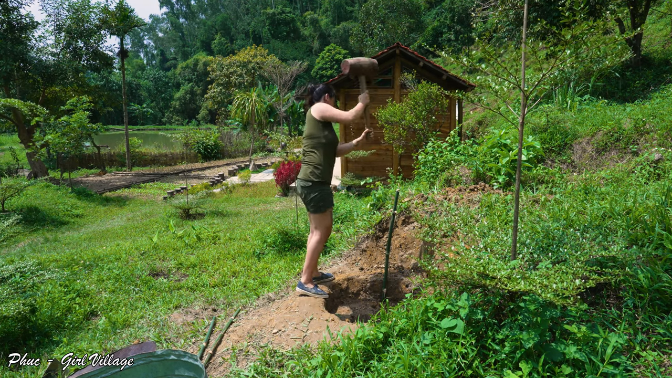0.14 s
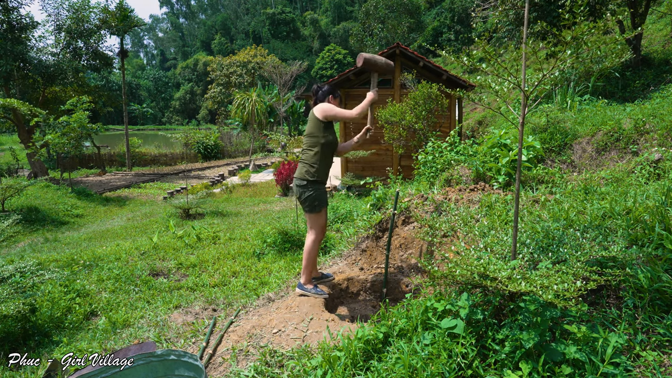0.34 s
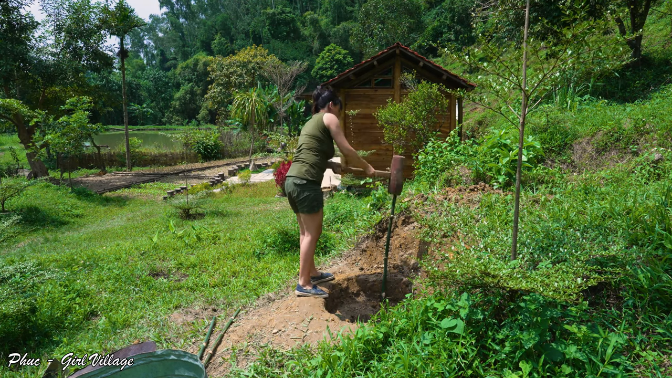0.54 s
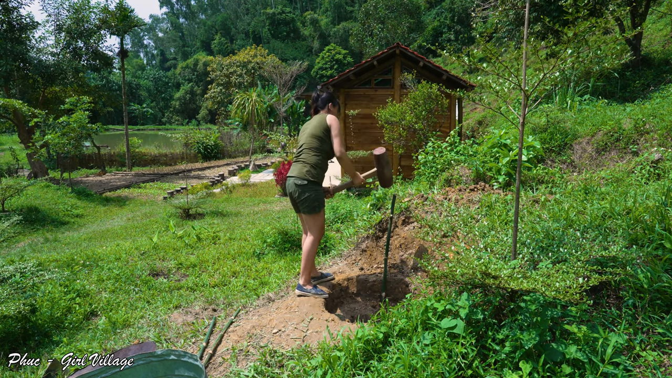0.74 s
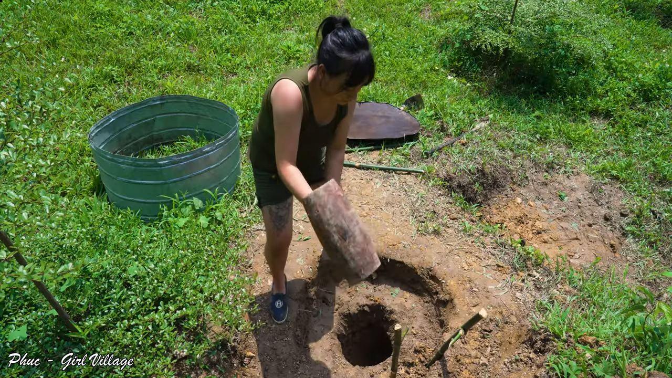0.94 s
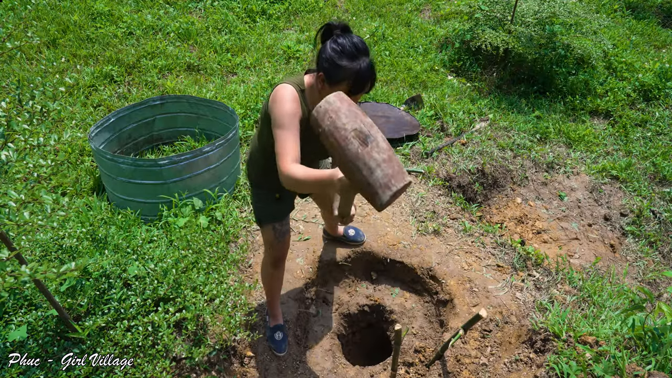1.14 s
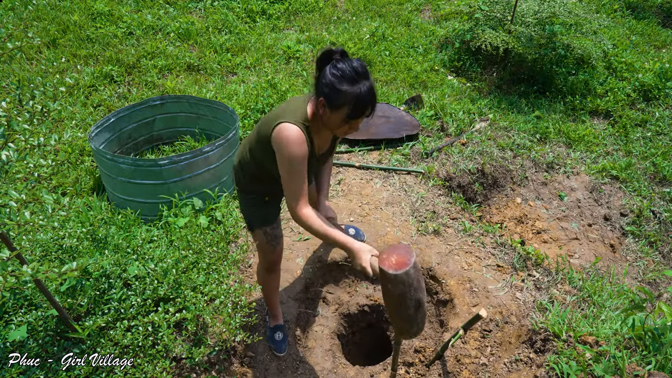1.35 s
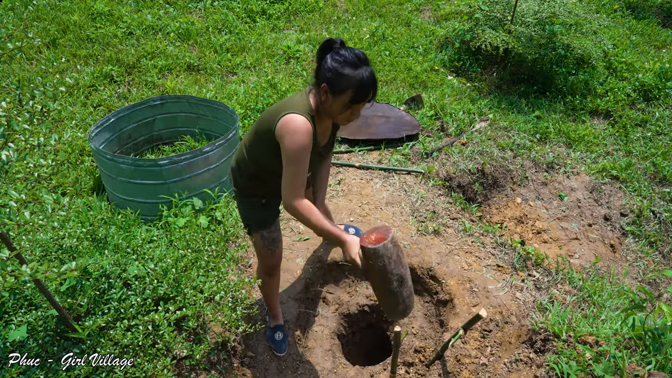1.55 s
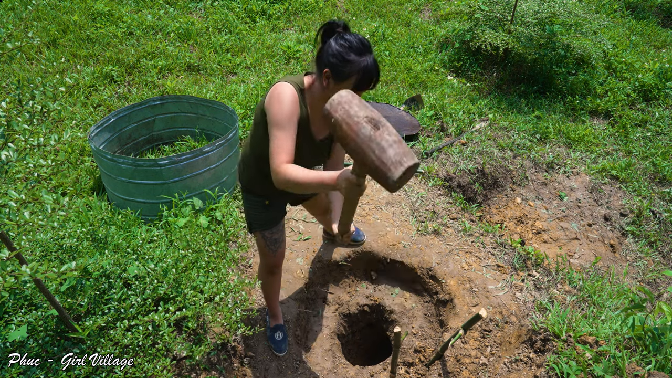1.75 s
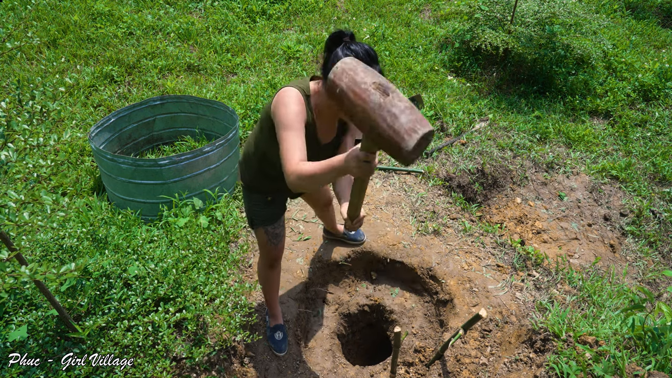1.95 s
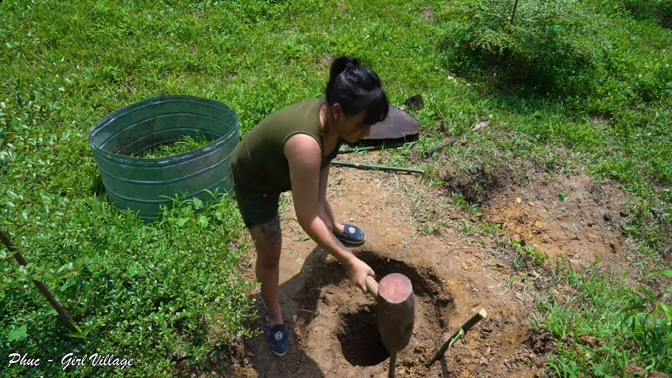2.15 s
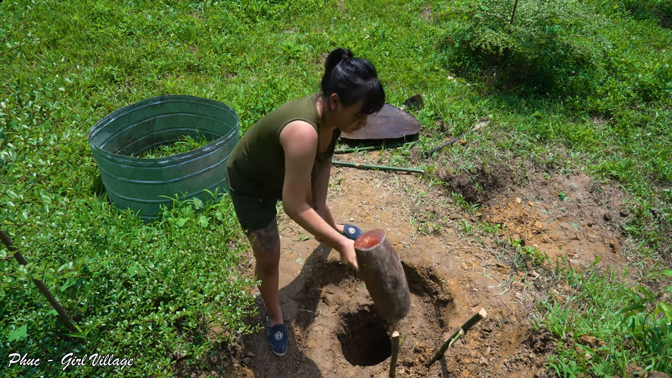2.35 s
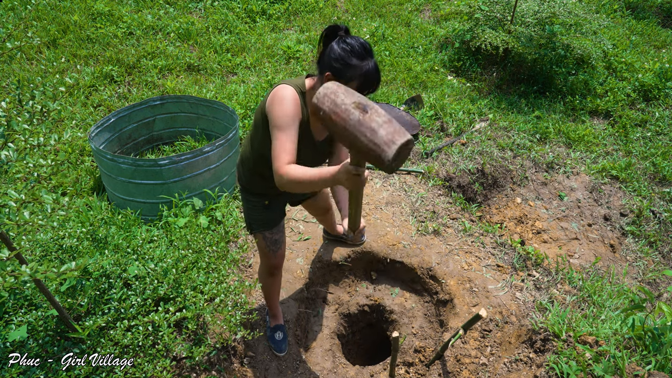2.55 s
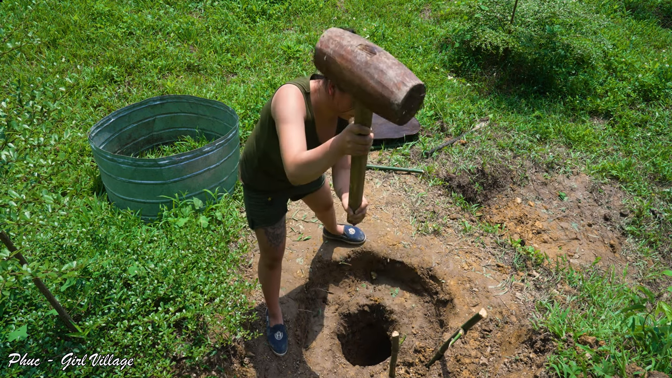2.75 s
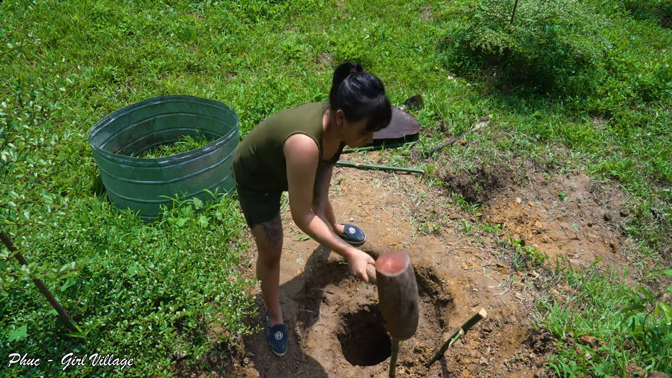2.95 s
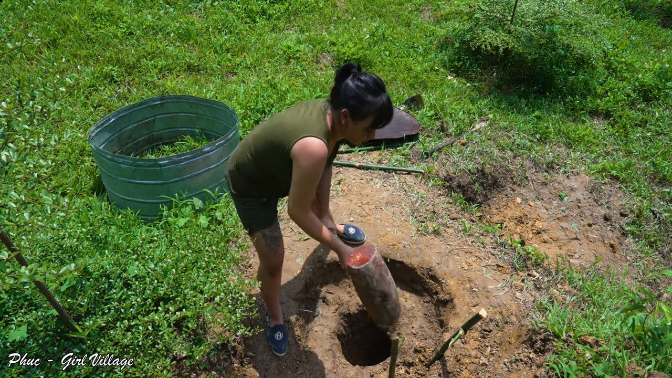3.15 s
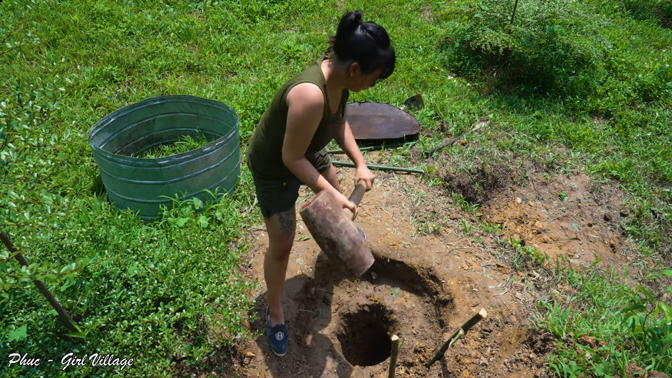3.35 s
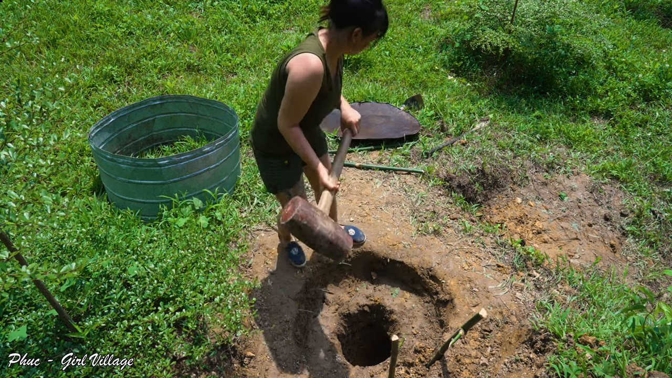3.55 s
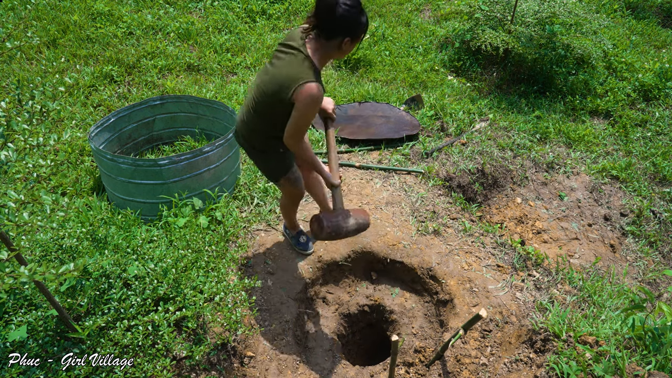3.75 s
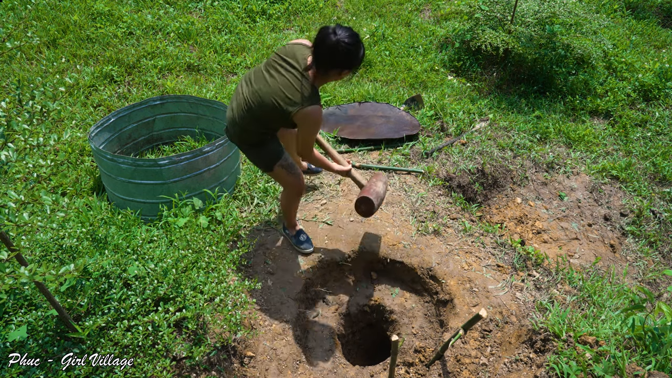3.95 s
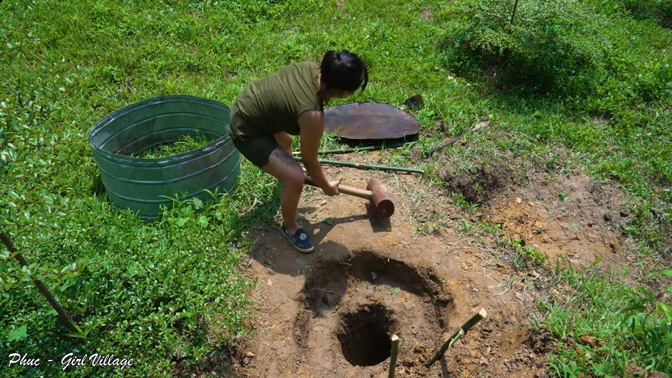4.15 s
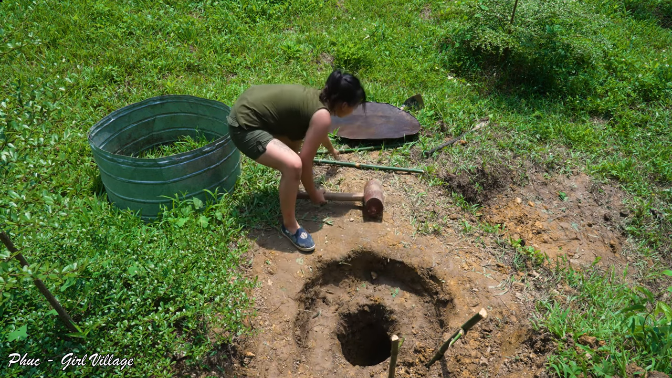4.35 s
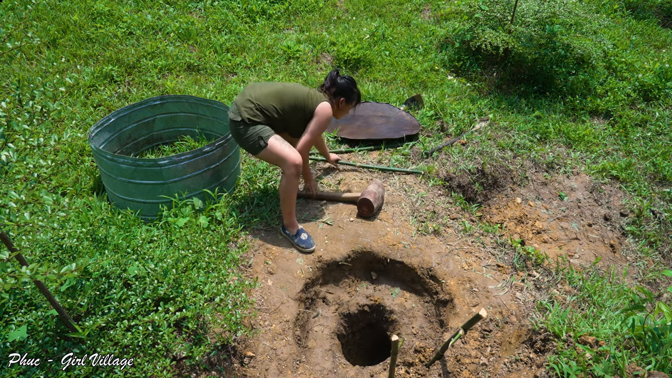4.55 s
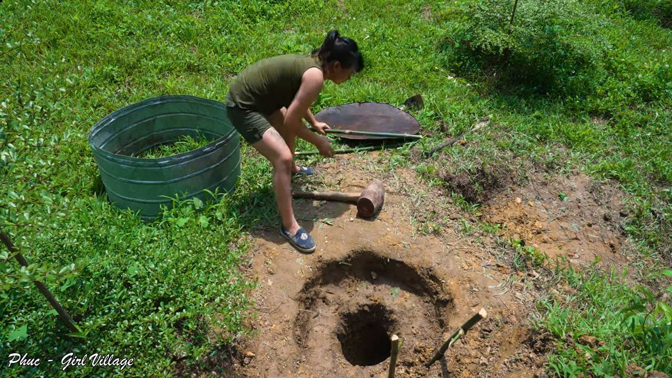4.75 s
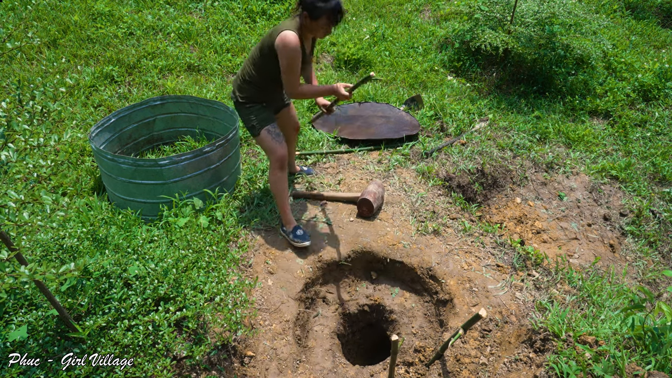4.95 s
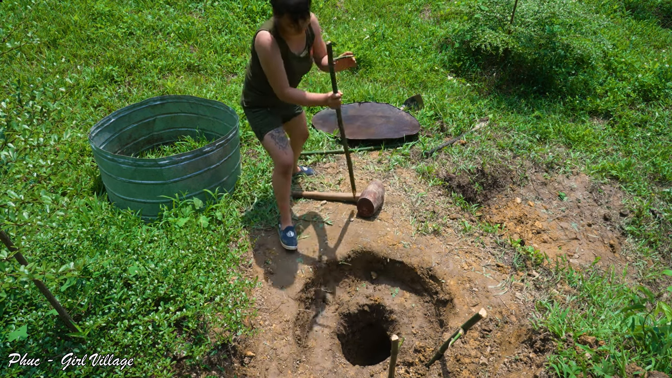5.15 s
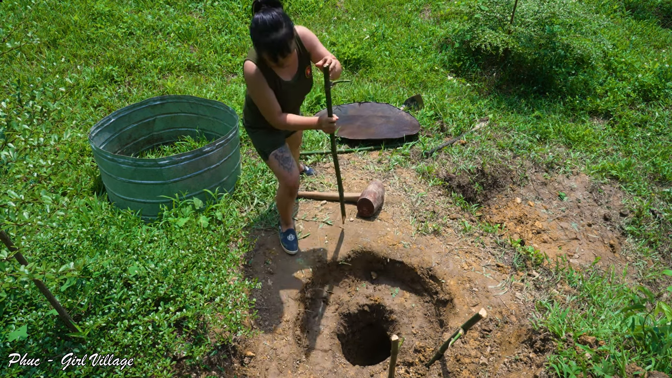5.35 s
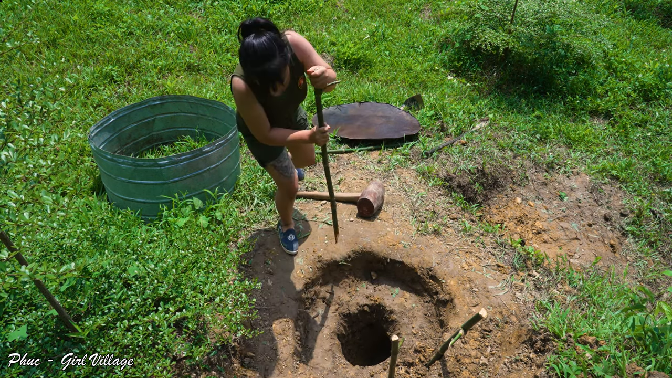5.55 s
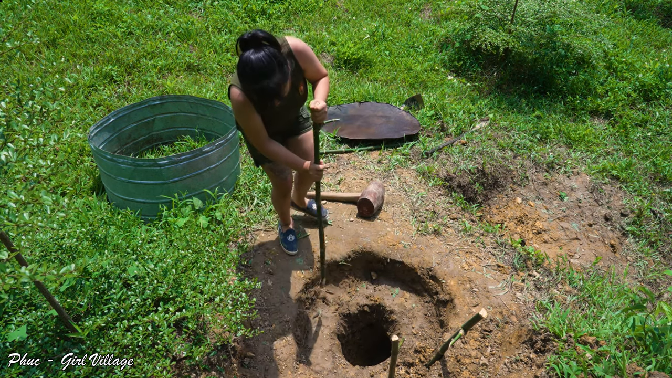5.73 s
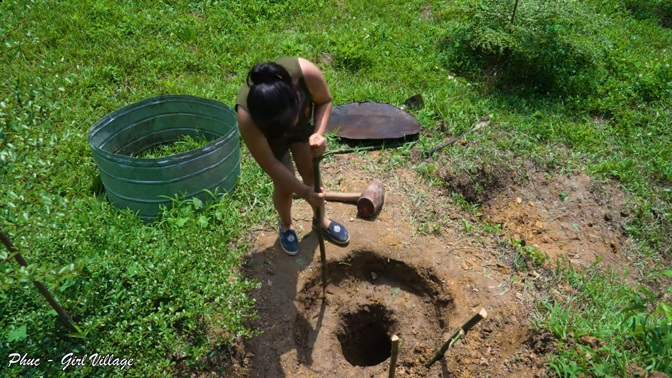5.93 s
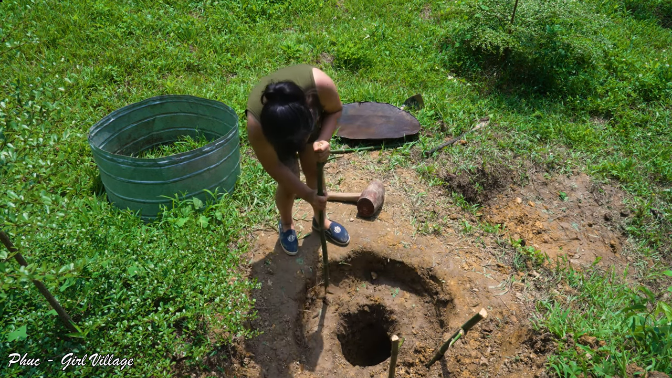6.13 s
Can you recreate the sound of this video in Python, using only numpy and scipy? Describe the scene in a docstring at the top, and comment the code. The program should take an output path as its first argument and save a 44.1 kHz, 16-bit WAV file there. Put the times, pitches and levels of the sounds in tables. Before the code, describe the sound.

In an open garden, close and almost dry, a heavy mallet hits a wooden stake once with a dull, hollow thock over low wind rumble on the microphone. The rumble drops away and the faint hiss changes. Three brighter, harder knocks follow at an unhurried pace, the last with the most crack. Then the mallet lands on soil with a soft thud, and a thin stick is lifted and clacks quietly.

```python
"""Mallet on stakes in a garden

Open garden, close to the microphone: a heavy wooden mallet strikes stakes into soil, one duller knock, then,
after the listening place changes, three brighter ones: decaying wood modes, a noise crack and a ground tremor.
The mallet is dropped with a thud; a stick is picked up and knocks lightly, as ringing modes and noise snaps.
Soft noise swells are hands and shoes on dry soil; a faint, dull tail comes back from banks and bushes.
Low noise is wind rumbling on the microphone at first; under everything lies one faint hiss, then another."""
import sys
import numpy as np
from scipy import signal
from scipy.fft import rfft, irfft
from scipy.io import wavfile
from scipy.ndimage import uniform_filter1d

SR = 44100
rng = np.random.default_rng(int(sys.argv[2]) if len(sys.argv) > 2 else 0)


def to_wav(sig):
    """Store sig (one row per channel, or 1-D mono) as 16-bit WAV at the path in sys.argv[1].

    Samples outside -1..1 are clipped; the rate is SR.
    """
    pcm = np.clip(np.atleast_2d(sig), -1, 1) * 32767
    pcm = np.round(pcm).astype(np.int16)
    wavfile.write(sys.argv[1], SR, pcm.T)  # frames by channels


N = 277380
TIME = np.arange(N) / SR
AGE = np.arange(SR) / SR   # one second counted from a contact


def from_db(db):
    """Decibels to gain."""
    return 10 ** (np.asarray(db) / 20)


def dying(t60):
    """An envelope that loses 60 dB in t60 seconds."""
    return np.exp(-np.log(1000) * AGE / max(t60, 1e-4))


def swelling(rise_s):
    """An onset that rises from silence towards 1 with time constant rise_s."""
    return 1 - np.exp(-AGE / rise_s)


def low_pass(x, hz, order=2):
    """Causal low-pass."""
    sos = signal.butter(order, min(hz, .45 * SR), fs=SR, output="sos")
    return signal.sosfilt(sos, x + 1e-18)


def high_pass(x, hz):
    """Causal high-pass: small bodies radiate little bass."""
    return signal.sosfilt(signal.butter(2, hz, "high", fs=SR, output="sos"), x)


def peak_or_dip(x, hz, db, q):
    """Lift or, with negative dB, dip one region of the spectrum."""
    b, a = signal.iirpeak(hz, q, fs=SR)
    return x + (from_db(db) - 1) * signal.lfilter(b, a, x)


def noise(spectrum, size):
    """Noise of a given colour, falling steeply outside its ends; rms 1."""
    hz, db = np.transpose(spectrum)
    f = np.maximum(np.fft.rfftfreq(size, 1 / SR), 1)
    colour = from_db(np.interp(np.log(f), np.log(hz), db))
    edges = np.minimum(1, np.minimum(f / hz[0], hz[-1] / f)) ** 4
    x = irfft(rfft(rng.standard_normal(size)) * colour * edges, size)
    return x / np.std(x)


def ring(modes, pitch=1, length=1, alternate=False, clock=AGE):
    """Decaying tones after one push; along a rod neighbouring modes start in opposite directions."""
    sign = -1 if alternate else 1
    total = 0
    for k, (hz, db, t60) in enumerate(modes):
        tone = np.cos(2 * np.pi * hz * pitch * clock)
        total = total + sign ** k * from_db(db) * dying(t60 * length) * tone
    return total


def through(x, response):
    """Pass a sound through an impulse response."""
    return signal.fftconvolve(x, response)[:len(x)]


def chatter(t60, rough):
    """A contact force: one push, then a quickly dying run of tiny slips."""
    slips = rng.standard_normal(SR) * dying(t60)
    force = rough * slips / np.linalg.norm(slips)
    force[0] += 1
    return force / np.hypot(1, rough)


def add(track, s, sound):
    """Mix a sound in at time s."""
    at = int(round(s * SR))
    track[at:at + len(sound)] += sound[:N - at]


# mallet on stake: t/s, thock level/dB, thock pitch ratio, rebound level/dB, ring level/dB, stake pitch ratio,
# ring length ratio, contact edge f/Hz, region f/Hz, gain at that region/dB, crack level/dB, ground level/dB
BLOWS = [(0.6252, -1.5, .62, -28, -2, 1.04, 0.69, 1300, 750, -3, -24.5, -39),
         (1.447, 0, 0.93, -18, -3.5, 1.0, 1, 2000, 2450, 4.5, -23.5, -37),
         (2.2156, 3, 0.965, -16, 1, 1.0, 1, 4000, 4700, 10.5, -21.5, -40),
         (3.0532, 0.5, 1.03, -11.5, 0.5, .995, 1.0, 3200, 1510, 8, -14.5, -34)]
# head and stake moving against the soil, before the pitch ratio: f/Hz, level/dB, t60/s
THOCK_MODES = [(141, -20.5, 0.064), (239, -22, 0.038), (336, -18, 0.036), (469, -7.5, 0.022),
               (628, -24.5, 0.058)]
# bending modes of a stake, before the pitch and length ratios: f/Hz, level/dB, t60/s
STAKE_MODES = [(668, -30, 0.05), (855, -23, 0.036), (986, -11.5, 0.027), (1190, -19.5, .026),
               (1270, -19, 0.03), (1436, -18, 0.018), (1585, -15, 0.021), (1794, -23.5, 0.03),
               (2090, -14, 0.017), (2410, -14.5, 0.018), (2675, -12.5, 0.027), (3174, -19.5, 0.02),
               (3500, -20.5, 0.025), (3680, -14.5, 0.013), (4140, -17.5, 0.012), (4520, -19.5, 0.025),
               (4790, -24.5, 0.022)]
# colour of crushed fibres at the contact, also of grit: f/Hz, relative level per Hz/dB
CRACK_COLOUR = [(300, 6.5), (900, 0), (2500, 3), (4800, -4), (5800, -12.5), (8500, -14.5), (12000, -20.5),
                (15500, -27)]


def mallet_blows():
    """Each blow gives a hollow thock, the stake's short ring, a crack of fibres and a tremor of the soil."""
    out = np.zeros(N)
    for (s, thock_db, thock_pitch, rebound_db, ring_db, stake_pitch, length,
         edge_hz, region_hz, region_db, crack_db, ground_db) in BLOWS:
        thock = low_pass(ring(THOCK_MODES, thock_pitch), hz=1510)
        thock = from_db(thock_db) * high_pass(thock, hz=88)

        stake = ring(STAKE_MODES, stake_pitch, length, alternate=True)
        bending = through(chatter(t60=0.004, rough=0.52), stake)
        # a softer contact rings duller; bending builds up while the head presses on the stake
        bending = low_pass(bending, edge_hz, order=1) * swelling(0.0013)
        bending = high_pass(bending, hz=297)
        # where the head lands decides which modes speak more or less
        bending = peak_or_dip(bending, region_hz, region_db, q=6.2)

        crack_decay = dying(t60=0.031) + from_db(-27.5) * dying(t60=.13)
        crack = noise(CRACK_COLOUR, SR) * crack_decay * swelling(0.00063)
        tremor = ground(rise_s=0.014, stiffening=1.92, relax_s=0.0223)

        add(out, s, thock + from_db(ring_db) * bending)
        add(out, s, from_db(crack_db) * crack + from_db(ground_db) * tremor)
        # the stake springs back a moment later
        add(out, s + 0.0105, -from_db(rebound_db) * low_pass(thock, hz=440))
    return out


# dull landings on the soil: t/s, thud level/dB, pitch ratio, contact edge f/Hz, contact roughness,
# contact t60/s, grit level/dB, ground level/dB
LANDINGS = [(0.6775, -25.5, 0.78, 950, 1.4, .05, -47.5, -52), (4.2240, -35, 0.62, 900, .7, .025, -53, -72),
            (4.2560, -20.5, 0.94, 5400, 0.061, .005, -40, -35.5),
            (4.2567, -23, 0.93, 5400, 0.35, .012, -42.5, -34)]
# a landing's short body, before the pitch ratio: f/Hz, level/dB, t60/s
LANDING_MODES = [(169, -19.5, 0.066), (291, -12, 0.024), (800, -6.5, 0.017), (1030, -10, 0.013),
                 (1710, -22, .012), (2500, -22, .012), (3450, -22, 0.014), (4400, -21, 0.014)]


def landings():
    """Weight meets soil: a dead knock, a little grit and the bounce of the ground."""
    out = np.zeros(N)
    for s, thud_db, pitch, edge_hz, rough, contact_t60, grit_db, ground_db in LANDINGS:
        body = through(chatter(contact_t60, rough), ring(LANDING_MODES, pitch))
        body = high_pass(low_pass(body, edge_hz), hz=90)
        grit = noise(CRACK_COLOUR, SR) * dying(t60=0.03)
        bounce = ground(rise_s=0.0099, stiffening=.4, relax_s=.006)
        add(out, s, from_db(grit_db) * grit - from_db(thud_db) * body + from_db(ground_db) * bounce)
    return out


# the soil bounces under a load; pitches once it has relaxed: f/Hz, level/dB, t60/s
GROUND_MODES = [(38, -3, 0.43), (52.1, 1, 0.32), (60, -10.5, 1.0), (90.4, -6.5, 0.22)]


def ground(rise_s, stiffening, relax_s):
    """The soil's bounce swells as the push spreads, and sinks in pitch as the load comes off."""
    # the clock starts (1 + stiffening) times too fast and settles to normal speed
    clock = AGE + stiffening * relax_s * swelling(relax_s)
    return ring(GROUND_MODES, clock=clock) * swelling(rise_s)


# the stick leaves the ground: t/s, level/dB
PICK_UP = (4.603, -51.5)
# its ring as it leaves the ground: f/Hz, level/dB, t60/s
PICK_UP_MODES = [(664, -1.5, 0.32), (1558, 4, 0.084), (2471, -2, 0.086), (4054, -4, .1)]
# the stick is handled: t/s, ring level/dB, pitch ratio, snap level/dB, snap t60/s
STICK_TAPS = [(5.2517, -39.5, 1.02, -36.5, 0.05), (5.2571, -37.5, 1.0, -42.5, 0.033),
              (5.3434, -60, 1.8, -54, 0.045), (5.3740, -52, 1.62, -34, 0.0093)]
# modes of the stick, before the pitch ratio: f/Hz, level/dB, t60/s
STICK_MODES = [(220, -17.5, 0.41), (597, -15, 0.1), (680, -17, .05), (926, -15, 0.19), (1304, -7, 0.055),
               (1631, -13, .05), (2083, -0.5, 0.036), (2520, -3, 0.048), (2960, -2, 0.04),
               (3820, -18, .035), (4760, -19, .035)]
# colour of bark and dry twigs snapping: f/Hz, relative level per Hz/dB
SNAP_COLOUR = [(200, -8), (1200, -4), (2800, -3), (3800, 3.5), (5000, 2), (6500, -10), (11000, -8.5),
               (15500, -20)]


def stick():
    """A thin stick rings faintly as it is lifted, then clacks and snaps in the hands."""
    out = np.zeros(N)
    lift_s, lift_db = PICK_UP
    lift = through(chatter(t60=0.048, rough=1.1), ring(PICK_UP_MODES))
    add(out, lift_s, from_db(lift_db) * lift)
    for s, ring_db, pitch, snap_db, snap_t60 in STICK_TAPS:
        wood = through(chatter(t60=0.0088, rough=.5), ring(STICK_MODES, pitch, alternate=True))
        snap = noise(SNAP_COLOUR, SR) * dying(snap_t60)
        add(out, s, from_db(ring_db) * wood + from_db(snap_db) * snap)
    return out


# hands and shoes brush over dry soil: t/s, level/dB, half length/s
BRUSHES = [(0.664, -62, .012), (4.21, -66, 0.077), (4.595, -65, .035), (5.56, -72, .02)]
# colour of the brushing: f/Hz, relative level per Hz/dB
BRUSH_COLOUR = [(1500, 8), (5000, -3), (8000, -10), (15500, -8)]


def brushes():
    """Rubbing over soil makes soft swells of gritty hiss."""
    swell = np.zeros(N)
    for s, db, half_s in BRUSHES:
        swell += from_db(db) * np.exp(-((TIME - s) / half_s) ** 2)
    return swell * noise(BRUSH_COLOUR, N)


# what banks and bushes scatter back: f/Hz, relative level per Hz/dB
SCATTER_COLOUR = [(110, 5.5), (250, -4), (460, -11.5), (680, -4), (1100, -11.5), (2200, -17), (8000, -18)]


def garden(x, wet_db, t60):
    """Banks and bushes scatter back a faint, dull tail: a decaying noise response."""
    tail = noise(SCATTER_COLOUR, SR) * dying(t60) * swelling(0.0042)
    return from_db(wet_db) * through(x, tail / np.linalg.norm(tail))


# colour of wind on the microphone: f/Hz, relative level per Hz/dB
WIND_COLOUR = [(12, -42), (20, -30), (49, 0), (69, 3), (102, -15), (124, -11), (157, -32), (260, -33),
               (340, -72), (570, -120)]
GUST_PEAK_S, GUST_DB, GUST_DROPS_S = .17, -39.5, .77
GUST_SWELL_DB_PER_S, GUST_EASE_DB_PER_S, GUST_DROP_DB_PER_S = 30, 15, 75


def wind():
    """One gust of low, even buffeting on the microphone swells, eases off slowly, then drops away."""
    swell_s = np.maximum(GUST_PEAK_S - TIME, 0)   # time left before the peak
    ease_s = np.clip(TIME, GUST_PEAK_S, GUST_DROPS_S) - GUST_PEAK_S
    drop_s = np.maximum(TIME - GUST_DROPS_S, 0)
    gust_db = (GUST_DB - GUST_SWELL_DB_PER_S * swell_s - GUST_EASE_DB_PER_S * ease_s
               - GUST_DROP_DB_PER_S * drop_s)
    eddies = noise(WIND_COLOUR, N)
    # dividing by the running level evens out the buffeting
    eddies = eddies / np.sqrt(uniform_filter1d(eddies ** 2, size=SR // 14) + .02)
    return from_db(gust_db) * eddies


# background hiss at the first listening place: f/Hz, relative level per Hz/dB
FIRST_HISS = [(120, -19), (200, -6), (366, -9.5), (500, -10), (538, -9.5), (1060, -12), (1250, -11.5),
              (1500, -14), (2290, -13.5), (2960, -17.5), (4860, -15.5), (7010, -29), (16000, -41.5)]
# background hiss at the second listening place: f/Hz, relative level per Hz/dB
SECOND_HISS = [(24, -38), (40, 6), (64, -0.5), (140, -0.5), (215, 1), (256, -5), (320, 1.5), (345, -2),
               (529, -2.5), (663, -3), (1900, -6.5), (2260, -8.5), (4930, -7), (14800, -36.5), (16000, -41)]
FIRST_HISS_DB, SECOND_HISS_DB = -60.5, -57
PLACE_CHANGES_S = .83


def air():
    """Steady outdoor hiss; where the listening place changes it switches to a louder one of another colour."""
    second = np.clip((TIME - PLACE_CHANGES_S) / 0.0061, 0, 1)   # a short crossfade
    first_hiss = from_db(FIRST_HISS_DB) * noise(FIRST_HISS, N)
    second_hiss = from_db(SECOND_HISS_DB) * noise(SECOND_HISS, N)
    return (1 - second) * first_hiss + second * second_hiss


def scene():
    """The work, its faint echo and the outdoor bed, on one channel."""
    work = mallet_blows() + landings() + stick() + brushes()
    return (work + garden(work, wet_db=-38, t60=0.27) + wind() + air())[None]


def record(dry):
    """The loudest peaks are rounded and the top is cut."""
    top, cutoff_hz = 0.95, 15900
    rounded = top * np.tanh(dry / top)
    return signal.sosfilt(signal.cheby1(12, .1, cutoff_hz, fs=SR, output="sos"), rounded)


dry = scene()
out = record(dry)
to_wav(out)
```